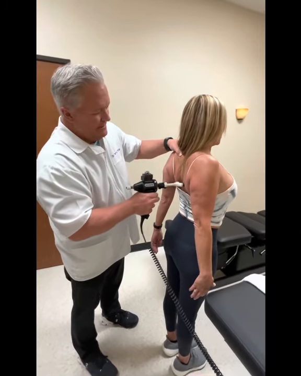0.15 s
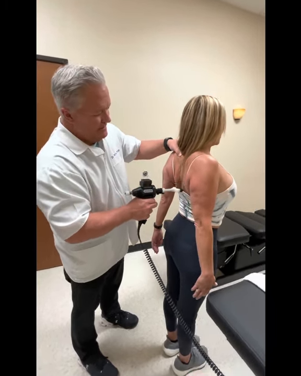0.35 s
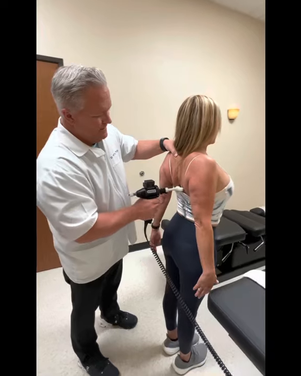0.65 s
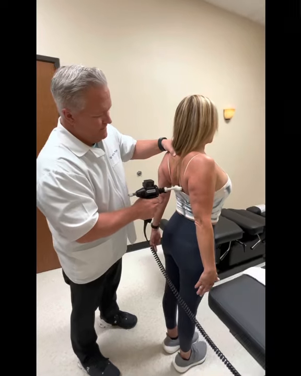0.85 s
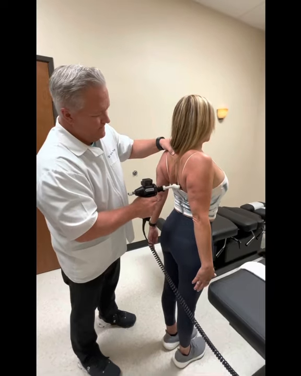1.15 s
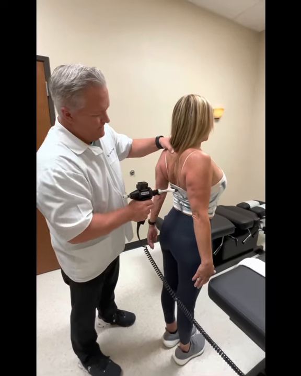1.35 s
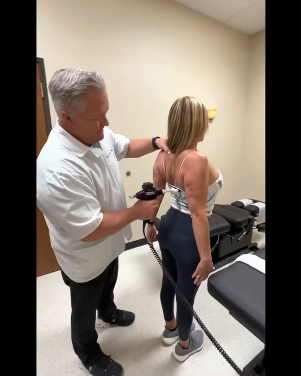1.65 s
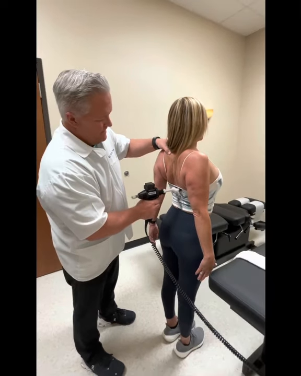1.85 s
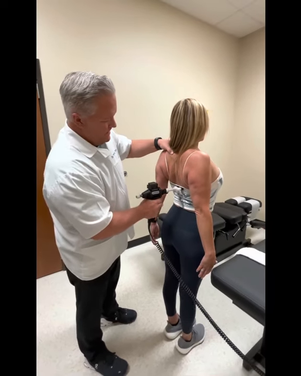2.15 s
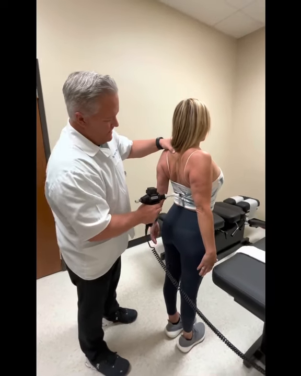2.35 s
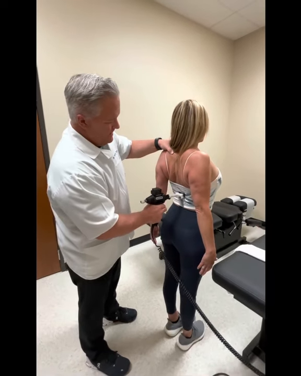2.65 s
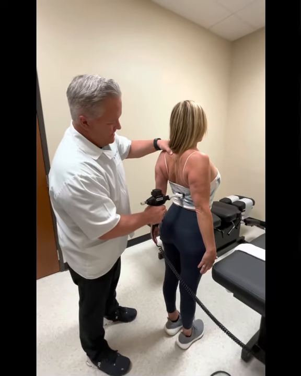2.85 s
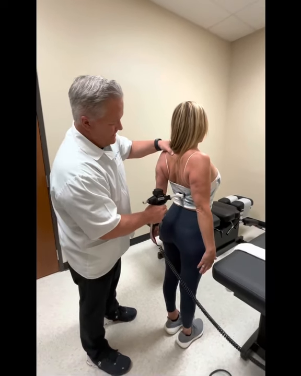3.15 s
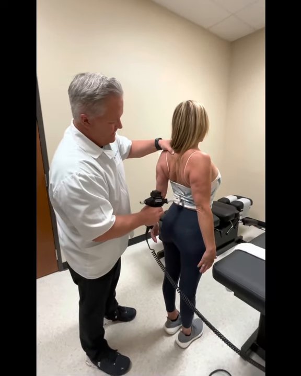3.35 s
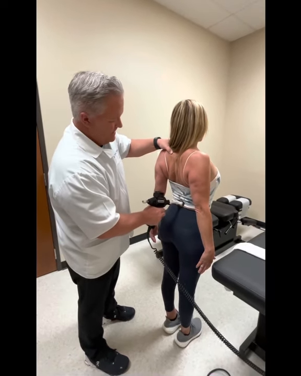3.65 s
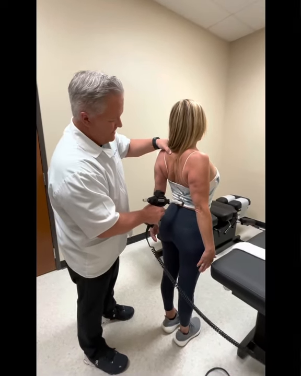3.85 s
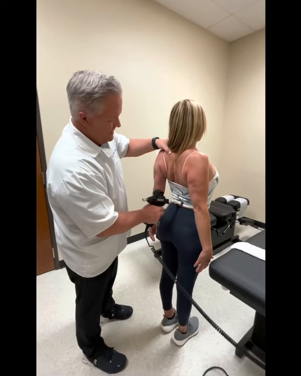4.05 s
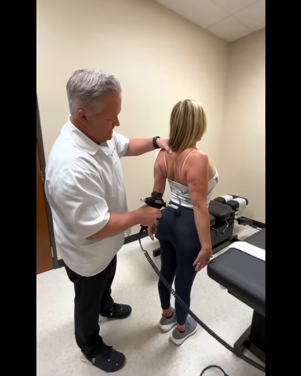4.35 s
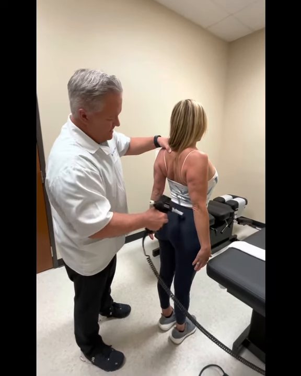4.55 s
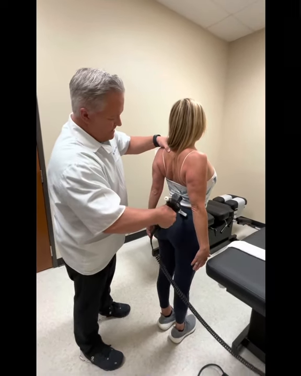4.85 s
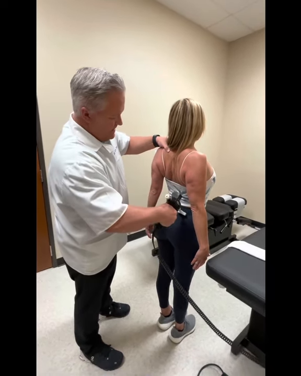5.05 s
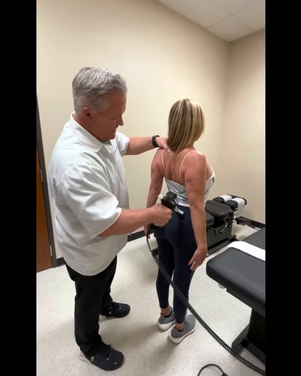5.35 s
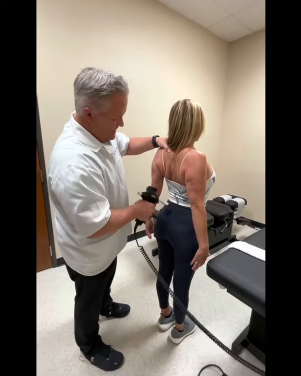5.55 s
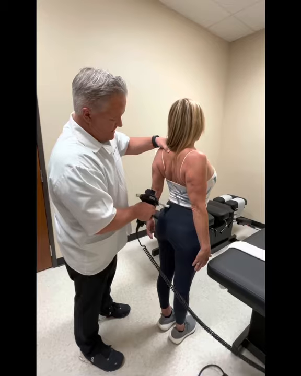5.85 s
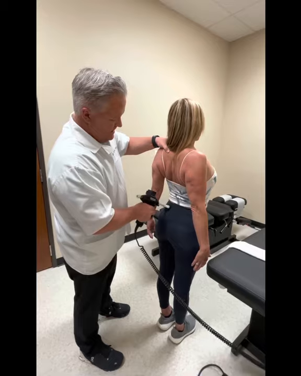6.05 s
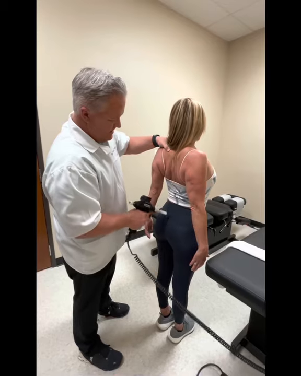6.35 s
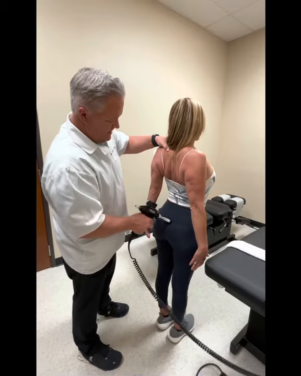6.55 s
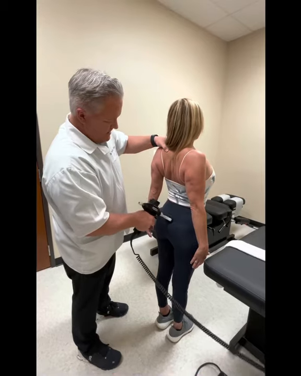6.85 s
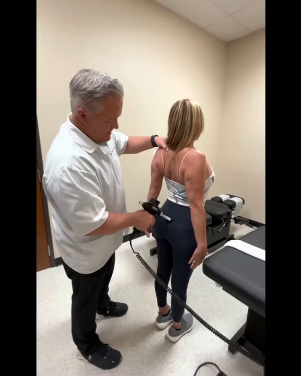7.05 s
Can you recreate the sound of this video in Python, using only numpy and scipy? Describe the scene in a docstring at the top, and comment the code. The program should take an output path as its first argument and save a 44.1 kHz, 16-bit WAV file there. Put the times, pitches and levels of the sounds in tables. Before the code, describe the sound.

In a small hard-walled room, a handheld electric adjusting tool hammers a patient's back in rapid bursts of about seven cracks, each burst half a second long with a half-second pause. Every stroke is a sharp metallic clack with housing ring, dull body thump and quick return click. Early bursts boom in the chest; later ones are drier. Close stereo microphone, faint air rumble and low hum.

```python
"""A handheld solenoid adjusting instrument taps down a patient's back in a small clinic room.
Over faint air rumble and a low hum, each burst strikes twelve times a second: the plunger slides and cracks,
metal chatters, the housing rings and the body thumps; about 20 ms later the stylus has rattled and the plunger clicks home.
Between bursts cloth brushes, the trigger clicks, the stylus seats and soft bumps sound.
The chest booms under the first bursts; the lower back and hip answer drier. Noise, modes and pulses make it all."""
import sys
import numpy as np
from scipy import signal
from scipy.fft import rfft, irfft, next_fast_len
from scipy.io import wavfile

SR = 44100
rng = np.random.default_rng(int(sys.argv[2]) if len(sys.argv) > 2 else 0)


def digitize_waveform(pressure):
    """Quantize a signal to 16-bit integers and store it at the path in sys.argv[1].

    Rows of a 2-D input are taken as channels; values are limited to [-1, 1].
    """
    field = np.atleast_2d(pressure).T
    bounded = np.clip(field, -1, 1)
    quanta = np.round(bounded * 32767).astype(np.int16)
    wavfile.write(sys.argv[1], SR, quanta)


N = 317150
LEAD_IN = SR // 4  # samples before time zero: the tapping is already under way
AGE = np.arange(16384) / SR  # time since a contact, s


def from_db(db):
    """Decibels to amplitude."""
    return 10 ** (np.asarray(db) / 20)


def at_hz(points, hz):
    """Read a table on a log-frequency axis."""
    points = np.array(points)
    return np.interp(np.log(np.maximum(hz, 1)), np.log(points[:, 0]), points[:, 1])


def unit(x, span_s=None):
    """Scale to rms 1, over the first span_s seconds if given."""
    head = x if span_s is None else x[:int(span_s * SR)]
    return x / np.sqrt(np.mean(head ** 2) + 1e-20)


def bins(size):
    """Frequencies of a real spectrum, Hz."""
    return np.arange(size // 2 + 1) * SR / size


def delayed(sound, delay_s):
    """Start a sound later within the same stretch."""
    return np.pad(sound, (int(delay_s * SR), 0))[:len(AGE)]


def add(track, start_s, sound):
    """Lay a sound into a track that starts LEAD_IN samples early."""
    start = max(round(start_s * SR) + LEAD_IN, 0)
    part = sound[:max(len(track) - start, 0)]
    track[start:start + len(part)] += part


def causal(colour):
    """Minimum-phase response with the given colour: nothing sounds before the contact."""
    cepstrum = irfft(np.log(from_db(at_hz(colour, bins(len(AGE))))))
    cepstrum[1:len(AGE) // 2] *= 2
    cepstrum[len(AGE) // 2 + 1:] = 0
    return np.exp(rfft(cepstrum))


def contact(rise_s, decay_s):
    """Force of a rough metal contact: a short random shudder, nearly even in spectrum, of unit energy."""
    age = AGE[:2048]
    envelope = (1 - np.exp(-age / rise_s)) ** 2 * np.exp(-age / decay_s)
    force = rng.standard_normal(len(age)) * envelope
    for _ in range(4):
        flat = irfft(np.exp(1j * np.angle(rfft(force))))
        force = flat * np.sqrt(envelope)
    return force / np.linalg.norm(force)


def struck(force, response, span_s=0.0043):
    """A small metal part under a contact force; it is too small to radiate bass."""
    no_bass = signal.butter(2, 300, "high", fs=SR, output="sos")
    sound = irfft(rfft(force, len(AGE)) * response)
    return unit(signal.sosfilt(no_bass, sound), span_s)


def mode(hz, t60_s, swell_s=0.00041):
    """One resonance: a decaying sine that builds up over swell_s."""
    age = AGE[AGE < 2 * t60_s]
    build = 1 - np.exp(-(age / swell_s) ** 2)
    ring = np.sin(2 * np.pi * hz * age) * from_db(-60 * age / t60_s) * build
    return np.pad(ring, (0, len(AGE) - len(age)))


def modes(table, pitch=1, spread_db=3.0, detune=.012):
    """An object's modes in alternating polarity, a little different at each blow as the grip gives."""
    total = 0
    for k, (hz, level_db, t60_s) in enumerate(table):
        strength = (-1) ** k * from_db(level_db + spread_db * rng.standard_normal())
        total = total + strength * mode(hz * pitch * (1 + detune * rng.standard_normal()), t60_s)
    return total


# ventilation colour: pitch_hz [Hz], density_db [relative dB per Hz]
AIR_COLOUR = [(15, -45), (25, -15.5), (50, -2.5), (85, -5.5), (131, 1.5), (192, -14), (262, -12.5),
              (513, -28.5), (756, -29.5), (1340, -33.5), (1870, -35), (3050, -39.5), (5970, -39.5),
              (9270, -63.5), (12000, -73), (15600, -100), (22000, -120)]
# level of the background noise over time, with a brief dip near 3.45 s: time_s [s], level_db [dB around AIR_DB]
NOISE_LEVEL = [(0.4, 0), (1.4, -3), (2.4, 0), (3.3, -1), (3.45, -7), (3.58, -1), (4.5, -1), (5.5, 0),
               (6.45, -4), (7.1, -1)]
AIR_DB, HUM_HZ, HUM_DB = -60.5, 124, -62


def background():
    """Ventilation is shaped noise, largely separate in each ear; the hum is a sine with narrow noise for waver."""
    hz = bins(N)
    common, left, right = rfft(rng.standard_normal((3, N)))
    spectrum = 0.28 * common + np.array([left, right])
    air = unit(irfft(spectrum * from_db(at_hz(AIR_COLOUR, hz)), N))
    narrow = 1 + ((hz - HUM_HZ) / 7) ** 2
    waver = unit(irfft(rfft(rng.standard_normal((2, N))) / narrow, N))
    hum = unit(np.sin(2 * np.pi * HUM_HZ * np.arange(N) / SR) + 4.3 * waver)
    level_db = np.interp(np.arange(N) / SR, *np.transpose(NOISE_LEVEL))
    return from_db(AIR_DB + level_db) * air + from_db(HUM_DB) * hum


# colour of loose metal: pitch_hz [Hz], density_db [relative dB per Hz]
CHATTER_COLOUR = [(420, 8.5), (550, 2), (650, 10), (900, 11.5), (1250, 9), (1500, 4), (2100, 5.5),
                  (2600, -0.5), (3050, 3), (3700, -3), (4100, 0), (4600, -4), (5200, -1.5), (6200, -10.5),
                  (8300, -1), (9500, -6.5), (12000, -14), (15500, -26.5)]
COLOUR_SPREAD_DB = 1.6  # no two blows shake the same parts equally


def slide(rise_s, decay_s):
    """The plunger scrapes along its guide, a soft shudder in the colour of loose metal."""
    return struck(contact(rise_s, decay_s), causal(CHATTER_COLOUR))


def chatter(shudder):
    """Loose parts shake on after the blow; part of the shudder is common to the whole burst."""
    shaken = [(hz, db + COLOUR_SPREAD_DB * rng.standard_normal()) for hz, db in CHATTER_COLOUR]
    return struck(0.33 * shudder + contact(0.0014, 0.0044), causal(shaken), span_s=0.0074)


# colour of the blow: pitch_hz [Hz], density_db [relative dB per Hz]
CRACK_COLOUR = [(150, -19), (450, -13), (630, -13), (900, 9), (1400, 2.5), (2100, 2.5), (2750, -8),
                (3250, -0.5), (3650, -6.5), (4100, -3), (4700, -6), (5900, -6), (6900, -14), (8100, 2.5),
                (11500, -11)]


def crack(blow, edge_db):
    """Metal meets metal: the more squarely, the brighter above 5 kHz."""
    edged = [(hz, db + edge_db * (hz > 5000)) for hz, db in CRACK_COLOUR]
    return struck(0.59 * blow + contact(0.0016, 0.0008), causal(edged))


# modes of the hollow shell: pitch_hz [Hz, scaled to the burst's ring], level_db [relative dB], t60_s [s]
HOUSING_MODES = [(794.1, -4, 0.075), (770.6, -8.5, 0.11), (825, -20, 0.13), (395.7, -25.5, 0.3),
                 (445, -23, 0.06), (990, -14.5, 0.13), (1225, -14.5, 0.076), (1370, -20, 0.025),
                 (1700, -18, 0.022), (2037, -14, 0.0069)]


def housing(ring_hz):
    """The hollow shell rings in a cluster of close modes; the load pulls its pitch."""
    pitch = ring_hz / HOUSING_MODES[0][0]
    # each mode on its own, so all share the first polarity
    rings = [modes([row], pitch, spread_db=2.24, detune=0.005) for row in HOUSING_MODES]
    return unit(sum(rings), 0.013)


# modes of the stylus: ratio [multiple of the clack pitch], level_db [relative dB], t60_s [s]
STYLUS_MODES = [(1.0, 5.5, 0.04), (1.16, -8.5, 0.02), (1.88, -2.5, 0.015)]


def stylus(clack_hz, detune, span_s):
    """The stylus clacks in a few short modes."""
    return unit(modes(STYLUS_MODES, clack_hz, detune=detune), span_s)


def knock(hz, peak_s=0.0052, width_s=0.0027):
    """The tip dents the flesh: one short, dull swing of air."""
    swing = np.sin(2 * np.pi * hz * (AGE - peak_s))
    return unit(swing * np.exp(-((AGE - peak_s) / width_s) ** 2), 0.02)


HALF_CYCLE_S = 1 / 120  # of the mains


def shoves(count, first_s=.0076, width_s=.0022, spread_db=1.2, release_db=2):
    """The coil shoves once on each mains half-cycle, with extra force as it lets go."""
    k = np.arange(count)[:, None]
    u = (AGE - first_s - k * HALF_CYCLE_S) / width_s
    strength = from_db(spread_db * rng.standard_normal((count, 1)) + release_db * (k == count - 1))
    pulses = (1 - 2 * u ** 2) * np.exp(-np.minimum(u ** 2, 100))
    return (strength * pulses).sum(axis=0)


def body(flesh_hz, flesh_db, push_db, boom_db):
    """The flesh quivers, the coil shoves it four times, and the chest booms on at 64 Hz."""
    flesh = unit(mode(flesh_hz, 0.026, swell_s=0.0092), .016)
    push = unit(shoves(count=4), .036)
    boom = unit(delayed(mode(64, 0.26, swell_s=0.015), .0135), .06)
    return from_db(flesh_db - 3.5) * flesh + from_db(push_db + 1) * push + from_db(boom_db - 0.3) * boom


# colour of the hard metal stops: pitch_hz [Hz], density_db [relative dB per Hz]
STOP_COLOUR = [(150, -23), (500, -16), (1200, -9.5), (2100, -4), (3200, -7.5), (4300, -4), (5200, -8.5),
               (6100, 0), (7100, 2), (8400, -5), (10000, 4), (12500, -12.5), (14500, 2), (16000, -18.5)]


def front_stop():
    """The plunger hits its metal front stop when the flesh gives way."""
    return struck(contact(0.0006, 0.0017), causal(STOP_COLOUR))


# colour of the stylus guide: pitch_hz [Hz], density_db [relative dB per Hz]
GUIDE_COLOUR = [(500, -13.5), (1500, 7), (2400, 3), (3050, 14), (4200, -3), (5500, -4), (9000, -31.5),
                (15000, -41.5)]


def rattle():
    """The loose stylus clicks against its guide."""
    return struck(contact(0.00064, 0.0011), causal(GUIDE_COLOUR))


# modes of the return spring: pitch_hz [Hz], level_db [relative dB], t60_s [s]
SPRING_MODES = [(5965, 3.5, 0.016), (6284, -4, 0.036), (6810, 0, 0.016), (8150, -2, 0.022),
                (14700, -13, .03)]


def spring():
    """The thin metallic ping of the return spring."""
    return unit(modes(SPRING_MODES, spread_db=2.5, detune=.01), 0.0022)


def rear_stop(ping_db, ring_hz, clack_hz):
    """The plunger clicks home and bounces once, pinging the spring and shaking housing and stylus."""
    stop = causal(STOP_COLOUR)
    click = struck(contact(0.00037, 0.0012), stop) + from_db(ping_db) * spring()
    bounce = delayed(struck(contact(0.00037, 0.0012), stop), .003 * rng.uniform(.8, 1.2))
    hit = from_db(-1.5) * (click + from_db(-14) * bounce)
    return hit + from_db(-12) * housing(ring_hz) + from_db(-11) * stylus(clack_hz, 0.0075, 0.0033)


# muffling of knock, clack and ring as the tip sinks into the lower back; the end values hold outside:
#   time_s [s], level_db [dB]
MUFFLE = [(4.77, -1), (4.85, -9), (5.10, -1.5), (5.18, 1)]
RING_MUFFLE_SHARE = .55  # part of that muffling that reaches the held housing
# plunger bouncing on its front stop: delay_s [s into the stroke], level_db [dB before the muffling share]
FRONT_STOP_HITS = [(0.0002, -20.5), (0.0034, -20)]
# the last stroke of a burst meets a slackening hand: the housing rings freely, the body takes less
FREE_RING_DB, LAST_KNOCK_DB, LAST_PUSH_DB, LAST_BOOM_DB = -25.5, -2, -10.5, -10
RING_SPREAD_DB = 0.53  # chance from stroke to stroke
RECOIL_HZ, RECOIL_DB = 385, -38.5  # the whole instrument jerks with the blow
TAKE_UP_S, TAKE_UP_DB = 0.0096, -20.5  # play taken up this long before a burst; relative to the crack
SLIDE_DB = -19  # relative to the crack


def instrument(strokes, burst, spot):
    """One burst on one spot, as two tracks: machine with body, and the knocks of the tip."""
    chatter_db, held_ring_db, ring_hz, clack_db, clack_hz, ping_db = burst
    firm_knock_db, knock_hz, flesh_hz, flesh_db, push_db, boom_db, _ = spot
    track, knocks = np.zeros((2, N + LEAD_IN))
    # pressed against the same load, the strokes share part of their force
    blow, shudder = contact(0.001, 0.0008), contact(0.0018, 0.0044)
    for k, (s, crack_db, edge_db, rattle_s, rattle_db, back_s, return_db) in enumerate(strokes):
        last = k == len(strokes) - 1
        muffle_db = np.interp(s, *np.transpose(MUFFLE))
        ring_db = FREE_RING_DB if last else held_ring_db + RING_MUFFLE_SHARE * muffle_db
        ring_db += RING_SPREAD_DB * rng.standard_normal()
        knock_db = firm_knock_db + muffle_db + last * LAST_KNOCK_DB
        if k == 0:
            add(track, s - TAKE_UP_S, from_db(crack_db + TAKE_UP_DB) * slide(0.002, 0.0017))
        # the plunger slides for a few milliseconds before it lands
        add(track, s - .0055, from_db(crack_db + SLIDE_DB) * slide(.003, 0.0027))
        add(track, s, from_db(crack_db) * crack(blow, edge_db))
        add(track, s + 0.000994, from_db(chatter_db + 2.3) * chatter(shudder))
        add(track, s, from_db(ring_db + 0.85) * housing(ring_hz))
        add(track, s + 0.002497, from_db(clack_db + muffle_db - 1) * stylus(clack_hz, 0.019, 0.011))
        add(track, s, from_db(RECOIL_DB) * knock(RECOIL_HZ, peak_s=0.00474, width_s=0.0032))
        add(knocks, s, from_db(knock_db - 6.0) * knock(knock_hz))
        thump = body(flesh_hz, knock_db + flesh_db, push_db + last * LAST_PUSH_DB, boom_db + last * LAST_BOOM_DB)
        add(track, s, thump)
        # the deeper the muffling, the harder the front stop is hit; a lift instead flips its polarity
        for delay_s, hit_db in FRONT_STOP_HITS:
            add(track, s + delay_s, from_db(hit_db) * (1 - from_db(muffle_db)) * front_stop())
        # on the way back the stylus rattles, then the plunger hits its rear stop
        add(track, s + rattle_s - .0006, from_db(rattle_db - 3.6) * rattle())
        add(track, s + back_s - .0006, from_db(return_db - 2.0) * rear_stop(ping_db, ring_hz, clack_hz))
    return track, knocks


# strokes while the trigger is held; levels are nominal dB, trimmed where they are played:
#   start_s [s], crack_db [dB], edge_db [dB of treble], rattle_s [s into the stroke], rattle_db [dB],
#   home_s [s into the stroke], return_db [dB]
STROKES = [(-0.0661, -32.5, 2.5, 0.0169, -47.5, 0.017, -25.8), (0.0168, -30, 3, 0.0169, -55, 0.0175, -25.5),
           (0.6005, -31.5, -2, 0.0163, -41.0, 0.022, -32), (0.6838, -28.5, 2, 0.0161, -40, 0.0224, -29),
           (0.7675, -28, 1.5, 0.0163, -52, 0.0214, -30.5), (0.8507, -27.5, -1, 0.0161, -52, 0.0212, -32.5),
           (0.934, -28.5, -3.0, 0.0178, -50, 0.021, -31), (1.0165, -27, -1, 0.0167, -52, 0.019, -28.5),
           (1.0997, -26, -4.5, 0.009, -32, 0.015, -27.5), (1.6005, -29.5, 2, 0.0163, -34, 0.023, -28),
           (1.6834, -26.5, -3, 0.0165, -30.5, 0.0229, -29), (1.767, -26.5, -1.0, 0.0156, -36, 0.0215, -29),
           (1.8504, -26.5, -2, 0.012, -43.0, 0.0219, -27.5), (1.9335, -26, 2.5, 0.013, -57, 0.0217, -28),
           (2.0168, -26, -3.5, 0.0156, -43, 0.0216, -30), (2.1005, -25.5, 2.5, 0.014, -30, 0.018, -25.5),
           (2.6001, -26.5, 1.5, 0.0107, -53.5, 0.0208, -29.5),
           (2.6835, -28, 4, 0.0154, -28.5, 0.023, -32.5), (2.7672, -26.5, 0.5, 0.017, -38, 0.024, -31),
           (2.8502, -26.5, 7, 0.0155, -32, 0.0226, -30), (2.934, -28, 0.5, 0.0152, -33.5, 0.024, -31.5),
           (3.017, -26.4, 0.5, 0.015, -53, 0.0218, -31.5), (3.1002, -26.5, 5, 0.0107, -34.5, 0.0184, -27.5),
           (3.6005, -26, 4.5, 0.0162, -49, 0.023, -29), (3.6842, -26, 8.5, 0.015, -36, 0.023, -30.5),
           (3.767, -27.5, 7, 0.0165, -32.0, 0.0226, -31), (3.8508, -25, -1, 0.0155, -31.5, 0.0223, -29),
           (3.9336, -26.5, 1.5, 0.0155, -32, 0.0226, -34.2), (4.018, -25, -1, 0.0155, -36.5, 0.019, -34),
           (4.0999, -24.5, 1, 0.0156, -36.5, 0.0176, -28), (4.6827, -29, 6.5, 0.015, -24.0, 0.022, -26.5),
           (4.7668, -25.5, -10.5, 0.0113, -32.5, 0.0218, -22),
           (4.8482, -23.5, 3.5, 0.0143, -33.5, 0.0249, -25), (4.9323, -23.5, 3, 0.015, -33.5, 0.024, -24.5),
           (5.0153, -25.5, 2.5, 0.0141, -30.5, 0.0245, -21),
           (5.098, -22.5, 3.0, 0.016, -27.5, 0.026, -23.5), (5.1829, -25.5, 0, 0.016, -39, 0.021, -26.5),
           (5.683, -27, -2.5, 0.01, -30, 0.0194, -30.5), (5.7671, -26, -4, 0.0114, -35, 0.02, -28.5),
           (5.8505, -27, -3, 0.0114, -30, 0.0206, -28.5), (5.933, -28.5, 1.0, 0.0127, -35, 0.0206, -29.5),
           (6.0162, -23.5, -4, 0.01, -32, 0.0202, -32), (6.099, -30, -9, 0.01, -40.5, 0.0153, -32.5),
           (6.5985, -25, 2.5, 0.0059, -54, 0.025, -25.5), (6.6833, -32, 6, 0.014, -52.0, 0.024, -23.5),
           (6.764, -24.5, 5.5, 0.0152, -33, 0.026, -24.5), (6.85, -26, 5, 0.0134, -51.0, 0.0232, -27.5),
           (6.9326, -30.5, 0, 0.017, -45, 0.023, -26), (7.016, -30, 3, 0.0108, -31, 0.0194, -28)]
# how the instrument sits in each burst, nominal levels:
#   chatter_db [dB], ring_db [dB], ring_hz [Hz], clack_db [dB], clack_hz [Hz], ping_db [dB re return click]
BURSTS = [(-31.5, -29, 790, -30, 990, -7), (-34.5, -26, 792, -33.5, 990, -8),
          (-34.5, -25.5, 798, -47, 900, -7), (-33.3, -26.3, 790, -33, 1000, -8.5),
          (-34.5, -28, 800, -29.5, 997, -8), (-29.7, -27.5, 835, -32, 1060, -3.5),
          (-30, -24.5, 805, -37, 1215, 1), (-31, -34, 830, -29, 1050, -3.5)]
# how the body answers under each burst, from chest down to hip, nominal levels:
#   knock_db [dB], knock_hz [Hz], flesh_hz [Hz], flesh_db [dB re knock], push_db [dB], boom_db [dB], room_db [dB]
SPOTS = [(-26.3, 250, 205, -14, -32, -35.5, 0), (-26.3, 295, 205, -12.5, -33, -36.3, -1.56),
         (-27.8, 305, 211.4, -9, -34.5, -40.3, -2.5), (-28.2, 335, 211, -7.5, -41.5, -47.5, -2.5),
         (-29.7, 295, 216, -8.5, -47.5, -57, -2.5), (-29.2, 265, 214, -9, -48.5, -56, -3.2),
         (-28.8, 253, 214, -11, -50.5, -63, -2.3), (-25.8, 242, 234, -4, -56, -60, -1.5)]
PAUSE_S = .2  # a longer gap between strokes separates two bursts


def tapping():
    """Play each burst on its own spot of the back, as one row of machine and one of knocks per burst."""
    strokes = np.array(STROKES)
    pauses = np.flatnonzero(np.diff(strokes[:, 0]) > PAUSE_S)
    runs = np.split(strokes, pauses + 1)
    return np.stack([instrument(*burst) for burst in zip(runs, BURSTS, SPOTS)], axis=1)


# reverberation: pitch_hz [Hz], t60_s [s]
ROOM_T60 = [(60, 0.5), (250, 0.66), (800, 0.39), (2000, 0.465), (6000, 0.41), (8000, 0.37), (9500, 0.25),
            (15000, 0.15)]
# colour of the reflections: pitch_hz [Hz], level_db [dB]
ROOM_COLOUR = [(60, -20), (100, -10), (140, 2), (165, 1), (205, -4.5), (270, -2.5), (450, -2.5),
               (560, -4.5), (800, -3), (2000, 1.2), (3200, -1.2), (4600, -0.5), (6000, 1.6), (8000, -5.5),
               (9500, -14), (11500, -26), (15000, -12.5)]
# left-right likeness of the reflections: pitch_hz [Hz], likeness [0-1]
ROOM_LIKENESS = [(60, 0), (130, .3), (350, .8), (900, .55), (1800, .2), (4000, .1), (6000, 0), (8000, .7),
                 (11000, .9)]


def room(early_db=-1.0, early_s=0.053, first_s=0.004):
    """Stereo reflections of a small hard room: noise, strong early on, with a tail that dies by band."""
    size = 32768
    age, hz = np.arange(size) / SR, bins(size)
    mid, side = rfft(rng.standard_normal((2, size)))
    alike = np.clip(at_hz(ROOM_LIKENESS, hz), -1, 1)
    field = np.sqrt(1 + alike) * mid + np.sqrt(1 - alike) * side * [[1], [-1]]
    build = (1 - np.exp(-(age / first_s) ** 2)) * (1 + from_db(early_db) * np.exp(-age / early_s))
    edges, out = np.geomspace(35, 18000, 37), 0
    for low, high in zip(edges, edges[1:]):
        centre = np.sqrt(low * high)
        decay = from_db(-60 * age / at_hz(ROOM_T60, centre))
        band = irfft(field * ((hz >= low) & (hz < high))) * build * decay
        # each band weighs in by its width
        share = np.sqrt(2 * (high - low) / SR / size)
        out = out + unit(band) * share * from_db(at_hz(ROOM_COLOUR, centre))
    return out


# microphone pair phase: pitch_hz [Hz], lead_rad [radians by which left leads]
MIC_PHASE = [(60, 1.5), (130, 1.2), (300, 3.0), (700, 3.6), (1200, 3.6), (1900, 5.2), (2500, 5.2),
             (3100, 4.6), (4300, 5.2), (5200, 3.0), (5650, .8), (6300, .2), (7100, 1.1), (8200, 2.4),
             (10000, 3.0), (13000, 3.2), (15300, 3.9)]
# microphone pair balance: pitch_hz [Hz], balance_db [dB, left minus right]
MIC_BALANCE = [(60, -5.5), (130, 7), (250, 10.5), (420, 2), (600, -2.5), (780, 5), (1000, 0.5), (2200, 4.5),
               (3200, 3), (5000, 3), (6000, -0.5), (7500, -1)]


def microphones(x):
    """The two ports take sound with a phase and level difference that change with pitch."""
    size = next_fast_len(x.shape[1] + SR) // 2 * 2
    hz = bins(size)
    gains = from_db(at_hz(MIC_BALANCE, hz) * [[.5], [-.5]])
    gains = gains / np.sqrt(np.mean(gains ** 2, axis=0))
    turn = np.exp(1j * at_hz(MIC_PHASE, hz) * [[.5], [-.5]])
    return irfft(rfft(x, size) * gains * turn, size)[:, :x.shape[1]]


# cloth and skin brush as the hand moves on: middle_s [s], length_s [s], level_db [dB]
BRUSHES = [(0.336, 0.11, -72), (2.422, 0.28, -69), (4.502, 0.2, -79), (5.55, 0.2, -70)]
# colour of that brushing: pitch_hz [Hz], density_db [relative dB per Hz]
CLOTH_COLOUR = [(200, -1), (500, -2), (800, 7), (1200, 0), (2100, -5), (4000, -18), (7000, -21),
                (12000, -35)]


def brushes(track):
    """Cloth and skin rub: coloured noise under a smooth swell."""
    cloth = causal(CLOTH_COLOUR)
    for middle_s, length_s, level_db in BRUSHES:
        swell = np.hanning(int(min(length_s * SR, len(AGE))))
        rub = unit(irfft(rfft(rng.standard_normal(len(AGE))) * cloth))
        add(track, middle_s - length_s / 2, from_db(level_db) * swell * rub[:len(swell)])


# the plastic trigger moves between bursts: start_s [s], level_db [nominal dB]
TRIGGER_CLICKS = [(0.4728, -53.5), (1.4834, -47.5), (3.499, -50.5), (5.6517, -54), (6.4222, -51),
                  (6.52, -71)]
# modes of the trigger: pitch_hz [Hz], level_db [relative dB], t60_s [s]
TRIGGER_MODES = [(800, -8, .02), (1150, -7, .014), (1900, -1, 0.018), (2250, -3, 0.009), (2900, -5, 0.007),
                 (4870, -10, .008)]


def trigger_clicks(track):
    """The plastic trigger rings in short modes over a chatter of loose parts."""
    for start_s, level_db in TRIGGER_CLICKS:
        plastic = unit(modes(TRIGGER_MODES, detune=0.036), .006)
        loose = struck(contact(0.002, .006), causal(CHATTER_COLOUR), span_s=.008)
        add(track, start_s, from_db(level_db - 11.5) * (1.1 * plastic + 0.7 * loose))


# the stylus seats as the tip is pressed on the next spot: start_s [s], level_db [nominal dB]
SEATINGS = [(0.5023, -52), (1.5385, -54.5), (2.5465, -53.5), (3.531, -54.5), (4.6365, -53.5), (5.654, -57),
            (6.573, -58)]


def seatings(track):
    """The stylus seats against its spring: a metal click and a ping."""
    for start_s, level_db in SEATINGS:
        click = struck(contact(.001, .003), causal(STOP_COLOUR))
        add(track, start_s, from_db(level_db - 9.0) * (click + 0.5 * spring()))


# soft handling bumps: start_s [s], level_db [nominal dB]
BUMPS = [(1.426, -50), (1.5, -60.5), (2.391, -50.5), (5.575, -38), (5.621, -37.5), (6.428, -64),
         (6.525, -58)]


def bumps(track):
    """Soft bumps are two low modes that swell and die."""
    for start_s, level_db in BUMPS:
        thud = mode(132, 0.18, swell_s=.007) + 0.62 * mode(205, 0.092, swell_s=.008)
        add(track, start_s, from_db(level_db - 4.5) * thud)


def handling():
    """Everything heard as the instrument is moved between bursts."""
    track = np.zeros(N + LEAD_IN)
    for layer in (brushes, trigger_clicks, seatings, bumps):
        layer(track)
    return track


# the knock reaches the ports in opposite polarity: one row each for left and right, gain [amplitude factor]
KNOCK_GAINS = [
    [1.11],
    [-0.37],
]
KNOCK_ROOM_DB = -4.3  # the knock carries into the room less than the machine does
SWAY_RATE = 11.0  # how fast the moving hand changes the reflections, radians per s


def scene():
    """The hand sways as it works, so the pattern of reflections keeps blending into another."""
    tracks, knocks = tapping()
    moves = handling()
    out = np.zeros((2, N + LEAD_IN)) + tracks.sum(axis=0) + moves
    room_gains = from_db([spot[-1] for spot in SPOTS])
    to_room = room_gains @ (tracks + from_db(KNOCK_ROOM_DB) * knocks) + moves
    sway = SWAY_RATE * np.arange(N + LEAD_IN) / SR
    # four patterns of reflections, whose shares always sum to unit power
    for fast in (np.cos(sway), np.sin(sway)):
        for slow in (np.cos(sway / np.pi), np.sin(sway / np.pi)):
            sent = (to_room * fast * slow)[None]
            out += signal.oaconvolve(sent, room(), axes=1)[:, :len(to_room)]
    # the knocks bypass the pair's phase and balance
    taps = microphones(out) + knocks.sum(axis=0) * KNOCK_GAINS
    return taps[:, LEAD_IN:] + background()


CEILING = .3  # amplitude where the microphones overload
CUTOFF_HZ = 16500


def record(dry):
    """The sharpest peaks are rounded; the deep bass and the top are cut."""
    rounded = CEILING * np.tanh(dry / CEILING)
    lean = signal.sosfilt(signal.butter(3, 36, "high", fs=SR, output="sos"), rounded)
    return signal.sosfilt(signal.ellip(10, .1, 80, CUTOFF_HZ, fs=SR, output="sos"), lean)


dry = scene()
out = record(dry)
digitize_waveform(out)
```